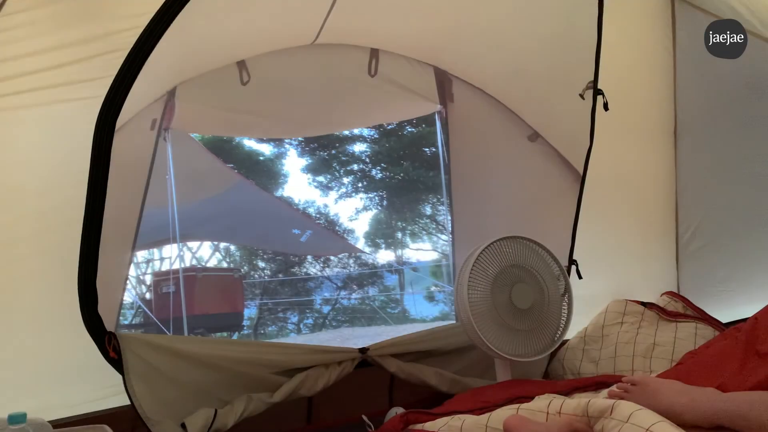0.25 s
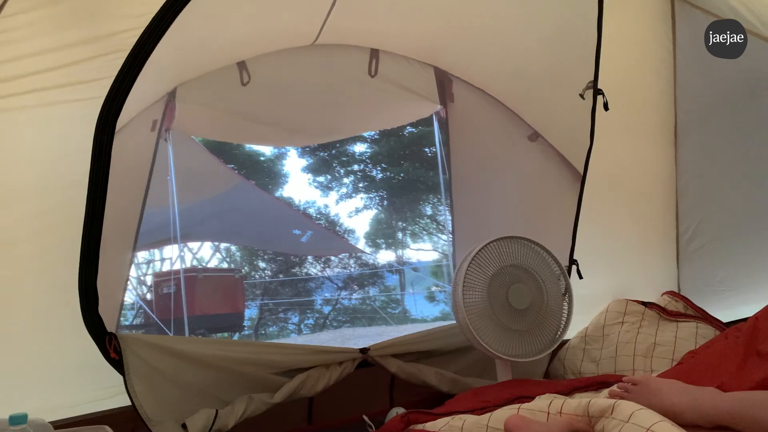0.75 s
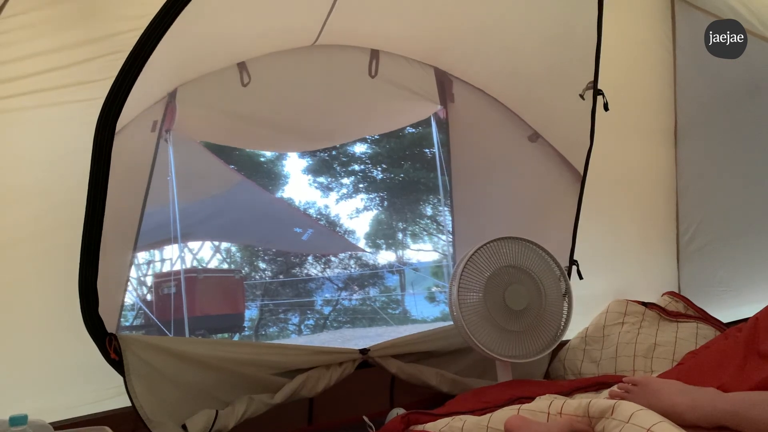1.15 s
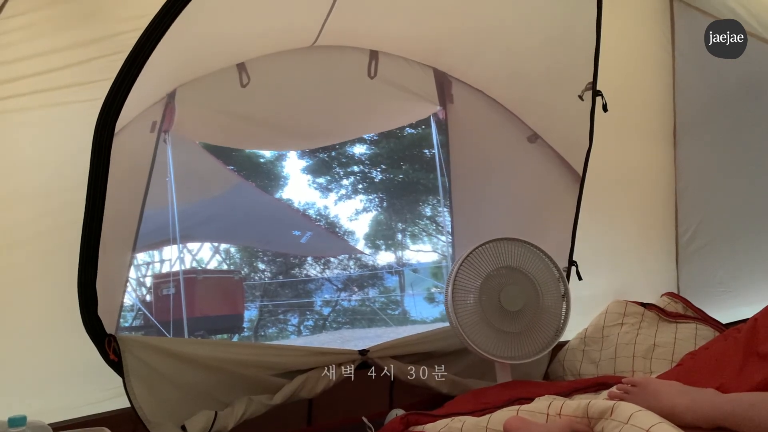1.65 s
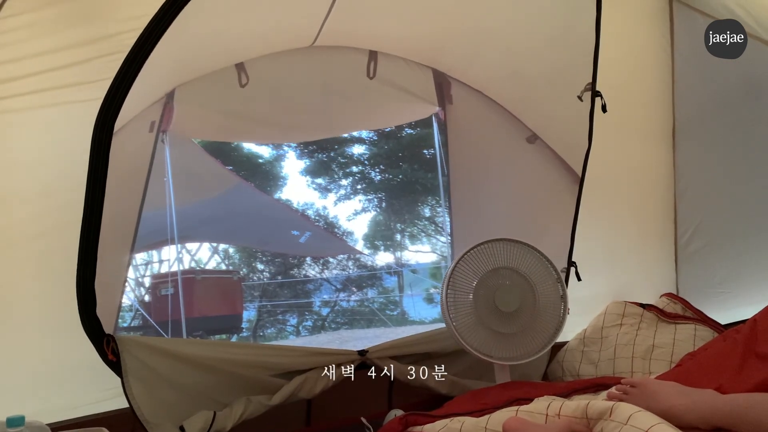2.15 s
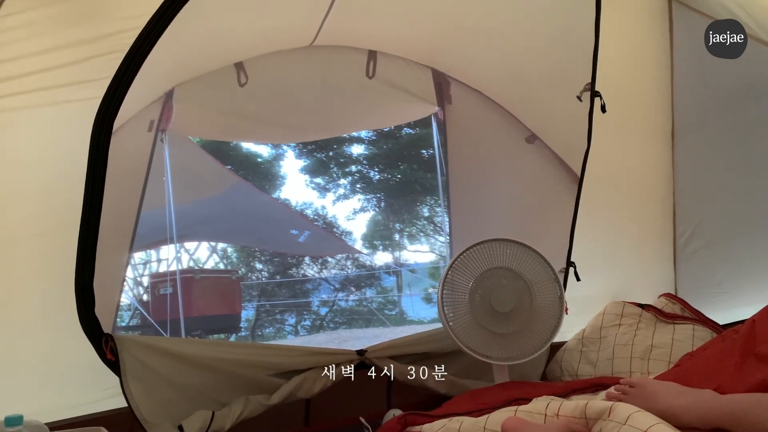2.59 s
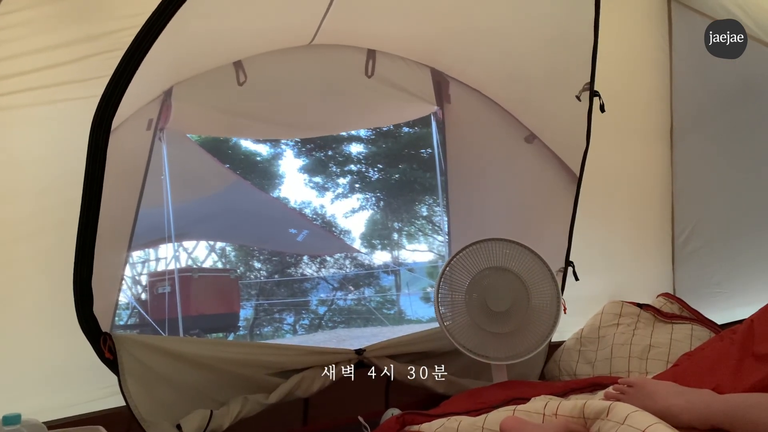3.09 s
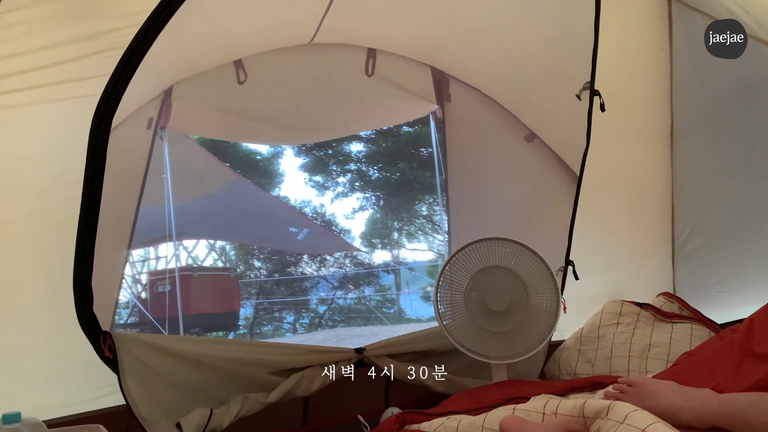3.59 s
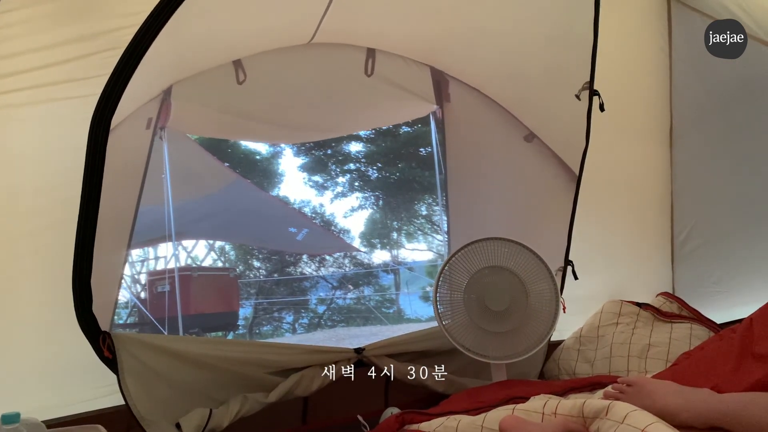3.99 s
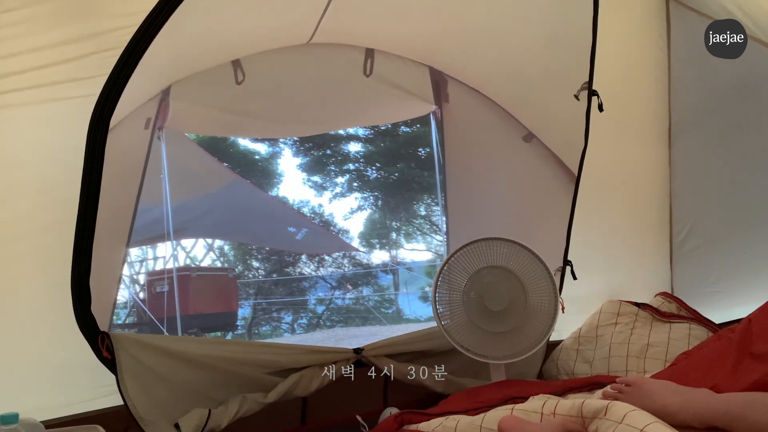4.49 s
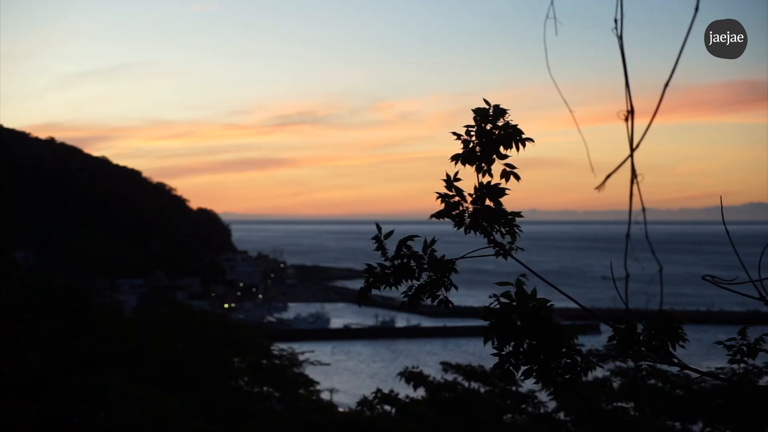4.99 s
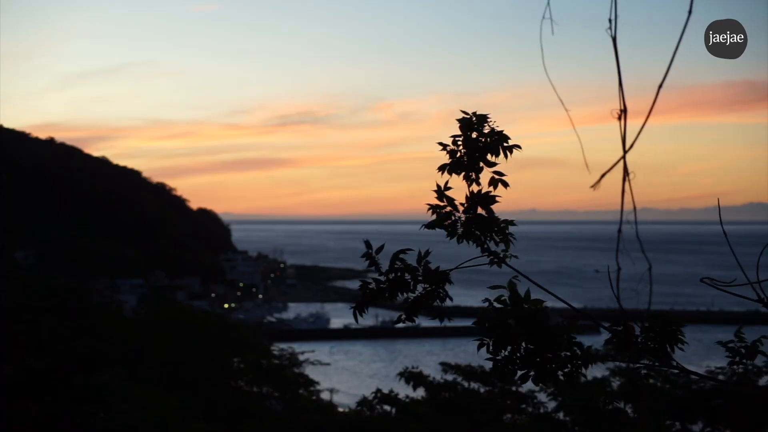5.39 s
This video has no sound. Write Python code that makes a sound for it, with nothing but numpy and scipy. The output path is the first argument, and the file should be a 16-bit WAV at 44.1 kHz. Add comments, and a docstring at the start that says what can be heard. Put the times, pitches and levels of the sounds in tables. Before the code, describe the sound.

Inside a tent, a shimmering insect buzz swells over rumbling fan air; an abrupt cut brings a louder hillside chorus with one near pulsing cicada.

```python
"""Summer insects at dawn. First, inside a tent, three swarms of many unevenly clicking insects drone in
the trees; two surge together and the low one answers just after. A fan's draught, made of shaped
noise, rumbles, slackens and blows harder, among soft low bumps made of short low tones.
After a cut, on a hillside above the sea, a louder cicada chorus has one near cicada pumping fourteen
syllables a second from ringing tones, over a faint far wash of noise, a hum and one soft low bump."""
import sys
import numpy as np
from scipy import signal
from scipy.fft import rfft, irfft
from scipy.io import wavfile

SR = 44100
rng = np.random.default_rng(int(sys.argv[2]) if len(sys.argv) > 2 else 0)


def to_wav(sig):
    """Store sig (one row per channel, or 1-D mono) as 16-bit WAV at the path in sys.argv[1].

    Samples outside -1..1 are clipped; the rate is SR.
    """
    pcm = np.clip(np.atleast_2d(sig), -1, 1) * 32767
    pcm = np.round(pcm).astype(np.int16)
    wavfile.write(sys.argv[1], SR, pcm.T)  # frames by channels


N = 249165
TIME = np.arange(N) / SR  # seconds
FREQ = np.fft.rfftfreq(N, 1 / SR)  # Hz

# In every left-right level, a positive number makes the left louder.
CICADA_PAN_DB = -4  # the hillside's whines and near cicada sit to the right


def gain_of(db):
    """Turns decibels into an amplitude factor."""
    return 10 ** (np.asarray(db) / 20)


def evened(x):
    """Scales a sound to an average strength (rms) of 1."""
    return x / np.sqrt(np.mean(x ** 2) + 1e-20)


def read(points, hz):
    """Joins (frequency, value) points by straight lines on a log-frequency axis."""
    point_hz, value = np.transpose(points)
    return np.interp(np.log(hz + 1), np.log(point_hz + 1), value)


def panned(pan_db):
    """Gives left and right gains whose levels differ by pan_db."""
    return gain_of(np.array([[.5], [-.5]]) * pan_db)


def noise():
    """Plain white noise: an equal mix of all pitches."""
    return rng.standard_normal(N)


def wander(rate_hz):
    """Drifts at random with rms 1, by keeping only the slow part of noise."""
    slow_part = np.exp(-.5 * (FREQ / rate_hz) ** 2)
    return evened(irfft(rfft(noise()) * slow_part, N))


def low_pass(x, edge_hz):
    """Steeply removes everything above edge_hz."""
    taps = signal.firwin(601, edge_hz, window=("kaiser", 9), fs=SR)
    return signal.oaconvolve(x, taps[None], "same")


def heard(source, colour, direct, lead_ms=0, pan_db=0):
    """Colours a source: its direct share reaches the left lead_ms before the right, over scattered noise."""
    direct = np.clip(direct, 0, 1)  # share of the power
    half_leads = lead_ms / 1000 * np.array([[1], [-1]]) / 2
    paths = np.exp(2j * np.pi * FREQ * half_leads)
    scattered = rfft(rng.standard_normal((2, N)))  # unrelated left and right, as if from all round
    both_sides = np.sqrt(direct) * paths * rfft(evened(source)) + np.sqrt(1 - direct) * scattered
    coloured = both_sides * gain_of(read(colour, FREQ)) * panned(pan_db)
    return evened(irfft(coloured, N))


def swarm(click_hz, spread_db, count):
    """Adds up many insects, each clicking unevenly at its own rate and loudness."""
    out = np.zeros(N)
    for nearness in np.linspace(-1, 1, count):
        rate = click_hz * 2 ** rng.uniform(-.5, .5)
        click_s = np.cumsum(1 + .08 * rng.standard_normal(4096)) / rate
        size = gain_of(spread_db * nearness) * rng.choice([-1, 1], len(click_s))
        inside = click_s * SR < N - 1
        out[(click_s[inside] * SR).astype(int)] += size[inside]
    return out


def patchy(x, depth_db, width_hz, length_s):
    """Roughens a sound: its level drifts at random in small patches of pitch and time."""
    hz, t, spectrum = signal.stft(x, SR, nperseg=2048, noverlap=1536)
    across = np.fft.fftfreq(len(hz), hz[1])[:, None]
    along = np.fft.fftfreq(len(t), t[1])
    smooth = np.exp(-(across * width_hz) ** 2 - (along * length_s) ** 2)
    random_field = np.fft.fft2(rng.standard_normal(smooth.shape))
    drift = evened(np.fft.ifft2(random_field * smooth).real)
    _, sound = signal.istft(spectrum * gain_of(depth_db * drift), SR, nperseg=2048, noverlap=1536)
    return evened(sound[:, :N])


def surging(t):
    """Gives the dB that the swarms' surges, four or five a second, add at time t."""
    # peak of each surge: (time [s], rise [dB])
    surges = [(0.17, 2.2), (0.42, 1.3), (0.66, 1.6), (0.91, 1.3), (1.13, 2.0), (1.32, 1.3), (1.53, 1.0),
              (1.71, 1.4), (1.93, 1.3), (2.17, 1.9), (2.43, 1.6), (2.61, 1.6), (2.82, 1.4), (3.03, 1.2),
              (3.23, 1.0), (3.43, 1.2), (3.67, 1.2), (3.99, 1.6), (4.27, 1.7), (4.5, 1.2), (4.69, 1.2)]
    surge_s = 0.06  # from the peak until the rise falls to about a third
    return sum(rise_db * np.exp(-((t - s) / surge_s) ** 2) for s, rise_db in surges)


def tent_insects():
    """Three swarms of clicks: a high hiss and a middle buzz surge together, and a low rasp answers."""
    # tone colour of each swarm: (frequency [Hz], relative level [dB])
    low_colour = [(1000, -60), (1500, -31), (1900, -18.5), (2400, -5.5), (2700, -5.5), (3130, -0.5),
                  (3800, -5), (4300, -7.5), (5200, -22), (7000, -63)]
    middle_colour = [(2500, -62), (3700, -12.5), (4300, -3.5), (4680, -0.5), (5200, -0.5), (5600, -2),
                     (6600, -6), (7600, -14.5), (10000, -63)]
    high_colour = [(5500, -30), (6700, -13), (7400, -4), (8000, -2), (8500, 0), (9200, -2), (10000, -8.5),
                   (11000, -16), (12400, -17.5), (14500, -15), (15700, -17)]
    # the highest hiss comes almost only by the straight path: (frequency [Hz], direct share [0-1])
    high_direct = [(7000, 0.93), (10000, 0.95), (11300, 1), (12300, 1), (13000, 1)]
    # the middle and high swarms' level rises briefly at the start, then eases a little: (time [s], level change
    # [dB])
    slow_effort = [(0.0, -0.2), (0.15, 0.8), (1.2, 0.6), (1.7, 0.0), (4.85, 0)]
    low_db, middle_db, high_db = -42.5, -39, -35.0  # levels before effort and surges
    answer_s, answer_share = 0.11, 1.1  # the low swarm's delay, and its share of each rise
    high_follows = 0.85  # share of the effort and surges that the high swarm follows

    low = heard(swarm(260, 3.2, count=16), low_colour, direct=0.23, lead_ms=0.42, pan_db=0.5)
    middle = heard(swarm(260, 5.5, count=24), middle_colour, direct=0.24, lead_ms=0.428, pan_db=-2.5)
    high = heard(swarm(280, 3, count=90), high_colour, direct=read(high_direct, FREQ), lead_ms=-.218)

    # give the drone a fine, shimmering grain
    low = patchy(low, depth_db=3.3, width_hz=65, length_s=.045)
    middle = patchy(middle, depth_db=3.7, width_hz=55, length_s=.045)
    high = patchy(high, depth_db=4.4, width_hz=32, length_s=.04)

    effort_db = np.interp(TIME, *np.transpose(slow_effort)) + surging(TIME)
    answer_db = answer_share * surging(TIME - answer_s)
    out = gain_of(low_db + answer_db) * low
    out += gain_of(middle_db + effort_db) * middle
    out += gain_of(high_db + high_follows * effort_db) * high
    return out


def tent_air():
    """Shaped noises: a steady deep rumble, the fan's whirr and gusts, and a faint outdoor wash."""
    # the fan's draught slackens, then blows harder: (time [s], level [dB])
    draught_level = [(0.0, -48), (0.2, -53), (0.3, -47.5), (0.7, -51.5), (0.95, -51), (1.65, -50),
                     (2.1, -52), (2.5, -54.5), (3.4, -54), (3.5, -49), (3.73, -46), (3.81, -53),
                     (3.88, -47), (4.1, -47), (4.53, -46.5), (4.62, -54), (4.7, -46.5), (4.85, -48.5)]
    # tone colour of each noise: (frequency [Hz], relative level [dB])
    draught_colour = [(35, -29), (60, -7), (95, -4), (140, 1), (200, -3.5), (260, -6.5), (400, -20.5),
                      (550, -32), (800, -66)]
    whirr_colour = [(100, -23), (210, -3.5), (290, -2), (400, -9), (550, -20.5), (800, -60)]
    rumble_colour = [(10, -46), (22, -33), (31, -22), (42, -1.5), (55, 3.5), (75, 2), (105, 0.5),
                     (140, -12.5), (200, -31), (600, -68)]
    wash_colour = [(200, 6), (500, 4.5), (750, -0.5), (1000, 1.5), (1500, -7.5), (2500, 3.5), (6000, -33)]

    gust_db = np.interp(TIME, *np.transpose(draught_level)) + 1.0 * wander(6.5)
    draught = heard(noise(), draught_colour, direct=0.92, pan_db=-3.0)
    whirr = heard(noise(), whirr_colour, direct=0.94, pan_db=-3.5)
    rumble = heard(noise(), rumble_colour, direct=1.0, pan_db=-1.5)
    wash = heard(noise(), wash_colour, direct=0.53, lead_ms=0.79, pan_db=5.5)
    out = gain_of(gust_db) * draught
    out += gain_of(-59.5) * whirr
    out += gain_of(-51) * rumble
    out += gain_of(-57.0) * wash
    return out


def bumps():
    """Soft low bumps: short low tones that swell and fade."""
    # (middle [s], level [dB], frequency [Hz], length [s], left-right level [dB])
    soft_bumps = [(0.195, -41, 65, 0.022, -2), (0.267, -46, 69.4, 0.023, -2), (0.685, -39, 72, 0.011, -2),
                  (1.17, -41, 91, 0.029, -3), (2.0, -45, 106, 0.033, -4), (2.83, -49, 62, 0.033, -2),
                  (3.74, -41.5, 98, 0.018, -3), (4.1, -41.5, 151, 0.017, -5), (4.77, -40, 67, 0.025, 0),
                  (4.81, -41, 135, 0.026, -3), (5.463, -50.5, 48, 0.015, -28)]
    out = np.zeros((2, N))
    for middle_s, db, hz, length_s, pan_db in soft_bumps:
        t = TIME - middle_s
        swell = np.exp(-(t / length_s) ** 2)
        out += panned(pan_db) * gain_of(db) * swell * np.sin(2 * np.pi * hz * t)
    return out


def whines():
    """Cicadas further off: tones wavering in pitch and level, with their own phase on each side."""
    # (middle frequency [Hz], level relative to base_db [dB])
    tones = [(2400, -20), (2772, -17), (4985, -5), (5260, -2), (5356, -2), (5871, -2), (6282, 0.5),
             (6481, -4), (7063, -1), (7445, -2), (7860, -2), (8064, -5), (8269, -1), (8500, -1.5),
             (9040, -6), (10370, -8)]
    base_db = -45
    out = np.zeros((2, N))
    for hz, db in tones:
        turns = np.cumsum(hz + 24 * wander(70)) / SR
        tone = np.sin(2 * np.pi * (turns + rng.random((2, 1))))
        out += gain_of(base_db + db + 3 * wander(25)) * tone
    return out


def hill_chorus():
    """A wall of clicking cicadas, mostly to the right, with a few wavering whines standing out."""
    # tone colour of the wall: (frequency [Hz], relative level [dB])
    wall_colour = [(1900, -38), (2200, -35), (2400, -18.5), (2750, -21.5), (2950, -24.5), (3900, -23),
                   (4400, -12.5), (4750, -5.5), (5050, -2), (5600, 1), (6500, -2.5), (7200, -5), (8500, -6),
                   (9050, -8.5), (9500, -8.5), (10100, -11), (10900, -5.5), (12000, -40)]
    # where the wall sits: (frequency [Hz], left-right level [dB])
    wall_pan = [(2500, -4), (4200, -2), (5400, -3.5), (6200, -4), (7200, -9), (8500, -14.5), (9700, -4),
                (10700, -1.5)]
    wall = heard(swarm(370, 5.5, count=24), wall_colour, direct=0.18, pan_db=read(wall_pan, FREQ))
    wall = patchy(wall, depth_db=2.9, width_hz=45, length_s=0.12)
    return gain_of(-30.0) * wall + whines() * panned(CICADA_PAN_DB)


def foliage(x, t60):
    """Leaves and trunks scatter a short noisy tail, different on each side, falling 60 dB in t60 s."""
    t = TIME[:8192]
    tail = rng.standard_normal((2, len(t))) * 10 ** (-3 * t / t60)
    tail /= np.linalg.norm(tail[0])
    return signal.fftconvolve(x, tail, axes=1)[:, :N]


def near_cicada():
    """Tymbal clicks split a ring into sidebands; the belly's resonance swoops down, holds and rises."""
    # the syllables swell, then fall back: (middle [s], hold [s], level [dB])
    syllables = [(4.866, 0.022, -34), (4.936, 0.02, -32.7), (5.005, 0.024, -31.4), (5.072, 0.024, -32.2),
                 (5.147, 0.02, -30.2), (5.227, 0.02, -32.7), (5.292, 0.024, -32.4), (5.364, 0.026, -35.4),
                 (5.436, 0.03, -35.2), (5.506, 0.022, -34.8), (5.582, 0.024, -36.3), (5.647, 0.022, -33)]
    # colour of the tymbal's own ring: (frequency [Hz], level [dB])
    tymbal_colour = [(4600, -23), (4985, -6.5), (5360, -5.3), (5740, -26), (6900, -30), (8200, -17)]
    ring_hz, click_hz = 5360, 377
    belly_open_hz, belly_width_hz = 5740, 280  # resonance of the open belly
    belly_climb = 88000  # Hz per second away from the hold
    tymbal_fade_s, belly_fade_s = 0.009, 0.0175  # outside the hold
    leaf_scatter = 0.5  # phase drift of each sideband, radians rms

    middles, holds, levels_db = np.transpose(syllables)
    nearest = np.argmin(abs(TIME - middles[:, None]), 0)
    # time to the nearest edge of the hold, zero within it
    closing_s = np.maximum(abs(TIME - middles[nearest]) - holds[nearest] / 2, 0)
    belly_hz = belly_open_hz + belly_climb * closing_s
    ring_turns = np.cumsum(ring_hz + 15 * wander(155) + 7 * wander(8)) / SR
    click_turns = np.cumsum(click_hz + 6 * wander(53)) / SR

    song = np.zeros((2, N))
    for k in np.arange(-2, 9):  # sidebands below and above the ring
        hz = ring_hz + k * click_hz
        tymbal = gain_of(read(tymbal_colour, hz)) * np.exp(-(closing_s / tymbal_fade_s) ** 2)
        belly = np.exp(-((hz - belly_hz) / belly_width_hz) ** 2 - (closing_s / belly_fade_s) ** 2)
        scatter = leaf_scatter * np.array([wander(25), wander(25)])
        song += (tymbal + belly) * np.cos(2 * np.pi * (ring_turns + k * click_turns) + scatter)
    song *= gain_of(levels_db[nearest])
    return (song + gain_of(-11) * foliage(song, t60=.07)) * panned(CICADA_PAN_DB)


def hill_air():
    """The sea's far wash is shaped noise; the faint hum over the harbour is two wavering low tones."""
    # tone colour of the wash: (frequency [Hz], relative level [dB])
    sea_colour = [(18, -42), (36, 1.5), (140, -0.5), (385, -8.5), (593, -11), (785, -12), (965, -15),
                  (1630, -18.5), (1970, -18.5), (2200, -10), (2860, -41), (4840, -120)]
    # (middle frequency [Hz], rms level [dB])
    hum_tones = [(122, -70), (145, -66)]
    out = gain_of(-57.0) * heard(noise(), sea_colour, direct=0.68, pan_db=-2.0)
    for hz, db in hum_tones:
        turns = np.cumsum(hz + 3 * wander(5.8)) / SR
        out += panned(-5) * gain_of(db) * evened(np.sin(2 * np.pi * turns))
    return out


def scene():
    """Plays the tent, then the hillside, with a very short fade on each side of the cut."""
    cut_s = 4.872
    tent_fade = np.clip((cut_s - TIME) / .007, 0, 1)
    hill_fade = np.clip((TIME - cut_s) / .014, 0, 1)
    tent = tent_insects() + tent_air()
    hill = low_pass(hill_chorus() + near_cicada() + hill_air(), edge_hz=11030)
    return tent * tent_fade + bumps() + hill * hill_fade


def record(dry):
    """The recorder's band limit removes the highest treble."""
    return low_pass(dry, edge_hz=15780)


dry = scene()
out = record(dry)
to_wav(out)
```